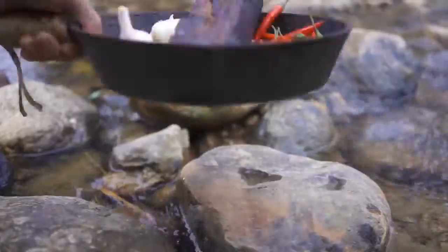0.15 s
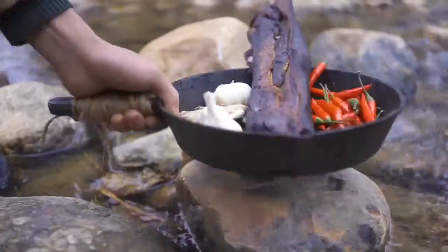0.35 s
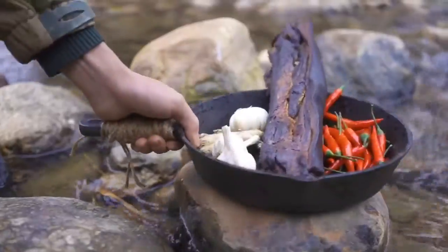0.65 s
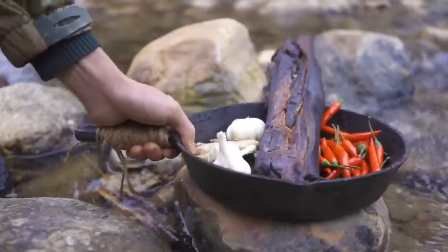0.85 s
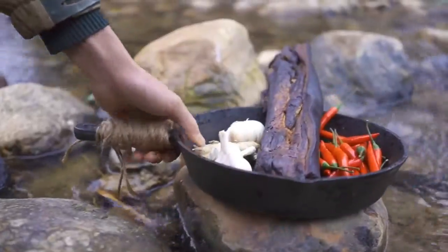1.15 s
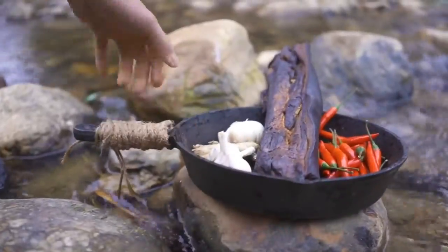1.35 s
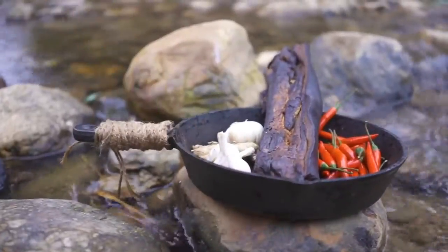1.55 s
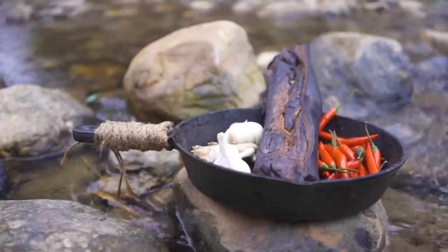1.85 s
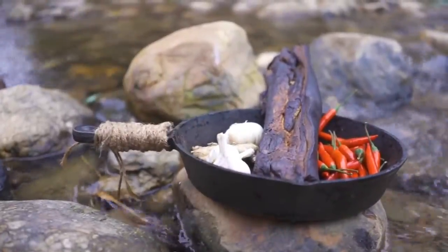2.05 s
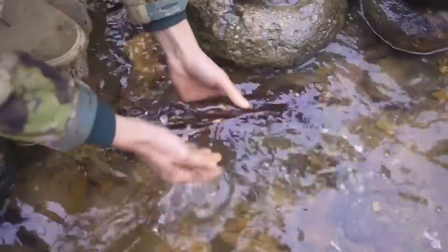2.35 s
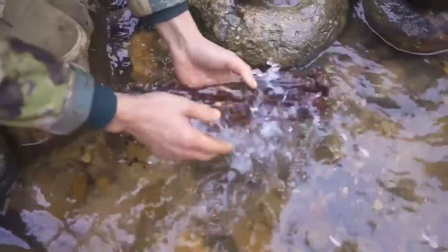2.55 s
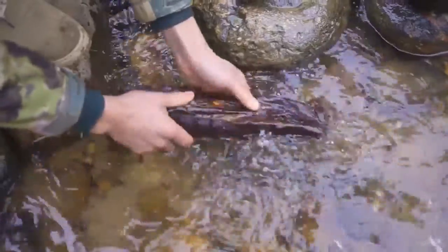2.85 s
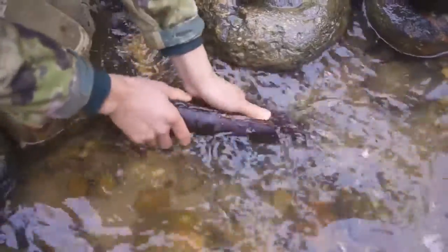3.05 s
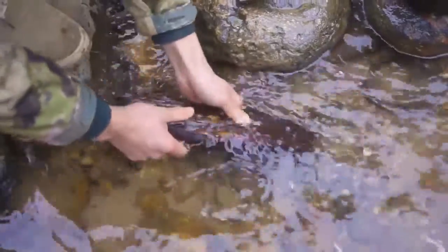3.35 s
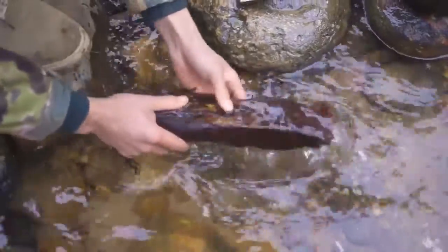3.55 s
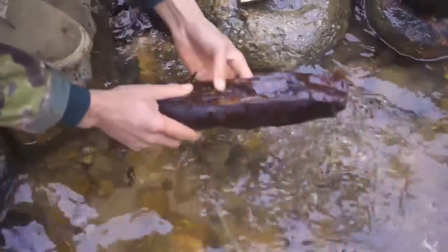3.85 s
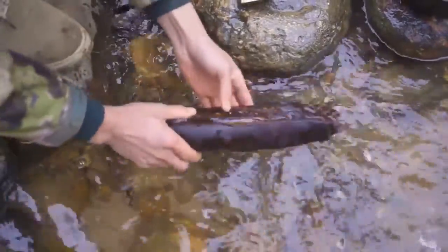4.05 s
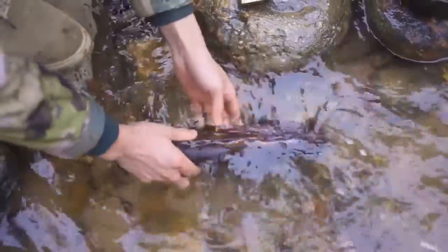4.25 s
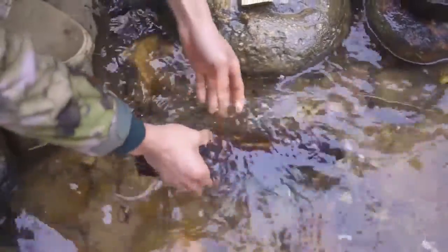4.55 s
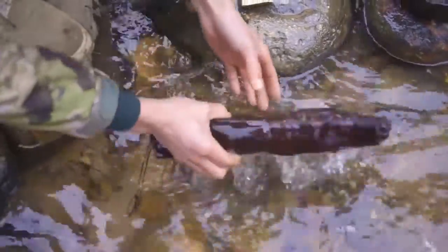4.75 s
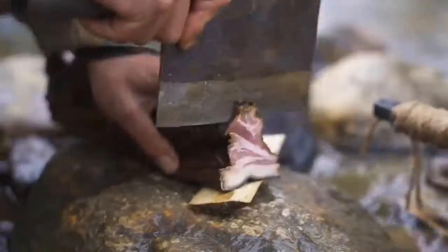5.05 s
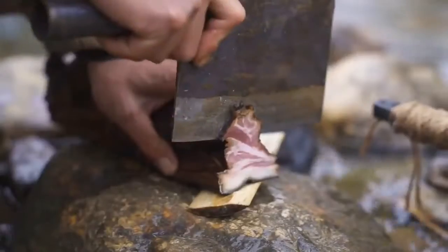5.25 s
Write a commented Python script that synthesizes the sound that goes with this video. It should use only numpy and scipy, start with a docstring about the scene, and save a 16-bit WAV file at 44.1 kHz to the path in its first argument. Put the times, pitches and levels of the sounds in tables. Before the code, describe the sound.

Quiet running water and deep rumble open the scene. Around one second a cast-iron pan grates briefly on rock and lands with a short, damped clank. After two seconds close splashing takes over: bubbly gurgles, spray and sharp drips in uneven bursts. A cleaver presses softly through meat at the end. Mono, close, dry open air with short dull reflections off stones.

```python
"""After a short silence a shallow stream babbles over a low throbbing drone and a rumble of wind.
An iron pan scrapes onto a boulder and knocks down: its ringing modes are struck, then kept alive by tiny slips.
Hands then rinse a slab of cured meat: swarms of ringing bubbles make the sloshes, gurgles, spray and drips.
Near the end a cleaver slides softly through the meat, as two shaped noises."""
import sys
import numpy as np
from scipy import signal
from scipy.fft import rfft, irfft, next_fast_len
from scipy.io import wavfile
from scipy.ndimage import uniform_filter1d, map_coordinates

SR = 44100
rng = np.random.default_rng(int(sys.argv[2]) if len(sys.argv) > 2 else 0)


def generate_wav(signal):
    """Clip the signal to [-1, 1] and save it as 16-bit WAV at the path in sys.argv[1]."""
    frames = np.transpose(np.atleast_2d(signal))
    scaled = np.clip(frames, -1, 1) * 32767
    pcm = np.round(scaled).astype(np.int16)
    wavfile.write(sys.argv[1], SR, pcm)


N = 238261  # length in samples, about 5.4 s


def amp(db):
    """Turns decibels into a gain."""
    return 10 ** (np.asarray(db) / 20)


def unit(x):
    """Scales a signal to an rms (average strength) of 1."""
    return x / np.sqrt(np.mean(x ** 2) + 1e-20)


def read(points, hz):
    """Reads a spectrum's dB at any frequency, in straight lines over log frequency."""
    f, db = np.transpose(points)
    return np.interp(np.log(hz + 1), np.log(f + 1), db)


def level(rows, axis=1):
    """Turns one dB column of a table into a smooth gain per sample; practically silent outside its times."""
    rows = np.array(rows)
    db = np.interp(np.arange(N) / SR, rows[:, 0], rows[:, axis], left=-120, right=-120)
    return uniform_filter1d(amp(db), size=130)


def colour(x, points):
    """Multiplies a sound's spectrum by a curve of (frequency [Hz], level [dB]), then scales to rms 1."""
    size = next_fast_len(N + 4096)
    gain = amp(read(points, np.fft.rfftfreq(size, 1 / SR)))
    return unit(irfft(rfft(x, size) * gain, size)[:N])


def add(mix, s, sound):
    """Mixes a sound in at time s, in seconds."""
    part = mix[round(s * SR):][:len(sound)]
    part += sound[:len(part)]


def wash(patchy_db):
    """White noise whose level drifts in small patches of time and pitch."""
    a, b, patches = rng.standard_normal((3, N // 128 + 6, 257))
    patches = uniform_filter1d(patches, size=7, axis=0)
    patches = unit(uniform_filter1d(patches, size=5, axis=1))
    spectra = (a + 1j * b) * amp(patchy_db * patches)
    return unit(signal.istft(spectra.T, nperseg=512, noverlap=384)[1][:N])


def bubble(hz, t60, rise, glide):
    """A trapped air pocket swells, fades by 60 dB in t60 seconds and climbs in pitch as it nears the surface."""
    t = np.arange(int((t60 + rise) * SR) + 8) / SR
    swell = np.minimum(t / (abs(rise) + 1e-5), 1)
    fade = amp(-60 * np.maximum(t - rise, 0) / t60)
    return swell * fade * np.sin(2 * np.pi * hz * np.cumsum(1 + glide * t / t60) / SR)


def swarm(per_s, low_hz, high_hz, cycles, spread_db, count=48):
    """Many small bubbles of varied pitch and random strength, roughly white overall."""
    out = np.zeros(N)
    for hz in np.geomspace(low_hz, min(high_hz, SR / 2.5), count):
        hz *= rng.uniform(.97, 1.03)
        ring_s = cycles * rng.uniform(1.0, 1.7) / hz
        grain = bubble(hz, ring_s, 1 / hz, glide=0.12)
        how_many = min(int(per_s * N / SR / count), 2000)
        at, size = rng.random((2, how_many))
        strength = amp(spread_db * np.minimum(-np.log(size), 4))
        clicks = np.bincount((at * N).astype(int), strength, N)
        out += hz * signal.oaconvolve(clicks, grain)[:N]
    return unit(out)


def stream(wash_db=-43.74, babble_db=-3):
    """Countless bubbles in the riffles merge into a wash; nearer ones stand out as babble."""
    # the running water's spectrum: (frequency [Hz], level [dB per Hz])
    water = [(60, 2), (130, 1.5), (250, -2.5), (520, -1.5), (900, -4), (1400, -6), (1900, -6),
             (2700, -17.5), (3800, -24), (5200, -26.5), (7000, -32.5), (10000, -36.5), (15800, -39)]
    babble = swarm(per_s=2500, low_hz=309.3, high_hz=7140, cycles=18.5, spread_db=1.0)
    return amp(wash_db) * (colour(wash(patchy_db=2.5), water) + amp(babble_db) * colour(babble, water))


def rumble(waver_hz=0.28, crest_s=0.12, fade_in_s=0.22, end_s=2.32):
    """Close low tones throb as they beat, until the rinsing begins; wind rumbles throughout."""
    # three low tones that beat against each other: (pitch [Hz], level [dB])
    tones = [(65.65, -41), (70.28, -38.5), (71.97, -44)]
    # wind spectrum: (frequency [Hz], level [dB per Hz])
    wind = [(15, -43), (35, -15.5), (55, 0.5), (70, 1), (95, -12), (140, -23.5), (250, -23), (600, -59)]
    # wind strength: (time [s], level [dB])
    gusts = [(0, -44.5), (2.25, -47.5), (2.35, -43), (3.0, -40), (3.5, -42.5), (4.0, -43.5), (4.95, -45.5),
             (5.1, -39), (5.4, -35.5)]
    t = np.arange(N) / SR
    # a slow random waver shared by all three tones
    waver = colour(rng.standard_normal(N), [(6, 0), (25, -50), (200, -120)])
    drift = rng.random() + np.cumsum(waver_hz * waver) / SR
    drone = np.zeros(N)
    for hz, db in tones:
        # the tones line up at crest_s
        drone += amp(db) * np.sqrt(2) * np.sin(2 * np.pi * (hz * (t - crest_s) + drift))
    sounding = np.minimum(t / fade_in_s, 1) * np.clip((end_s - t) / .02, 0, 1)
    return sounding * drone + level(gusts) * colour(rng.standard_normal(N), wind)


def bumps():
    """Soft handling bumps: dull, quickly damped thuds."""
    # (time [s], peak level [dB], pitch [Hz], time to fall 60 dB [s])
    thuds = [(1.99, -35, 192, 0.037), (1.997, -26, 280, 0.033), (2.291, -30, 129, 0.14),
             (2.304, -35, 233, 0.062), (5.16, -46, 305, .04), (5.173, -33, 193, .06), (5.19, -31, 380, .04)]
    out, t = np.zeros(N), np.arange(SR // 5) / SR
    for s, db, hz, t60 in thuds:
        add(out, s, amp(db - 60 * t / t60) * np.sin(2 * np.pi * hz * t))
    return out


def cleaver():
    """The blade presses dully into the meat and hisses along the cut."""
    # the cut: (time [s], press level [dB], hiss level [dB])
    cut = [(5.02, -67, -89), (5.1, -47.5, -68), (5.17, -41.5, -56), (5.22, -51, -64), (5.27, -42.5, -52.5),
           (5.32, -48, -63), (5.4, -44, -70)]
    # spectra of the press and the hiss: (frequency [Hz], level [dB per Hz])
    press_curve = [(80, -15), (170, 0), (450, 6), (900, -11), (2500, -9), (6000, -62)]
    hiss_curve = [(800, -3), (3000, 3), (7000, 0), (10000, -4), (15800, -15)]
    press, hiss = rng.standard_normal((2, N))
    # sparse random clicks, about 1500 a second
    fibres = unit(rng.standard_normal(N) * (rng.random(N) < 1500 / SR))
    pressing = level(cut, axis=1) * colour(press, press_curve)
    return pressing + level(cut, axis=2) * colour(hiss + amp(6) * fibres, hiss_curve)


def pan_ring(ring, tilt_db, pitch):
    """The iron's modes ring after one contact and die away; resting on the stone damps them."""
    # modes, before the factors of each contact: (pitch [Hz], level [dB], time to fall 60 dB [s])
    iron_modes = [(501, -1, 0.037), (575, -1, 0.076), (699, -18, 0.12), (970, 0.5, 0.011),
                  (1076, -9.5, 0.12), (1156, -10, 0.076), (1304, -5, 0.014), (1677, -9.5, 0.065),
                  (1730, -10, 0.033), (2100, -16, 0.056), (2500, -14.5, 0.052), (2970, -31, 0.062),
                  (3130, -46, 0.025), (3670, -26, 0.022), (4530, -24, 0.033), (5170, -43, .04),
                  (5770, -37.5, 0.046), (6636, -41, 0.074), (7100, -50, 0.1), (7850, -44.5, .04),
                  (8630, -45.5, 0.045)]
    t = np.arange(SR // 2) / SR
    out = np.zeros(len(t))
    for k, (hz, db, t60) in enumerate(iron_modes):
        tilt = tilt_db * np.log2(hz / iron_modes[1][0])  # dB per octave around the second mode
        fade = amp(db + tilt - 60 * t / (t60 * ring))
        out += (-1) ** k * fade * np.sin(2 * np.pi * hz * pitch * t)
    return out * (1 - np.exp(-t / .001))


def pan_knocks(grit_db=-15, grit_s=0.003, tail_db=-31, tail_s=.016):
    """Each contact with the stone crushes grit and sets the iron ringing."""
    # (time [s], gain [dB], factor on ring time, brightness [dB per octave], factor on pitch)
    contacts = [(0.8622, -23.5, 1.25, -1.5, 1.11), (0.933, -37.5, 1.8, 5.5, 1.04),
                (1.0221, -5.5, 1.22, 0.5, 1), (1.313, -35, 1.35, 5.5, 1.06)]
    out, t = np.zeros(N), np.arange(N) / SR
    onset = np.sin(np.pi / 2 * np.minimum(t / .001, 1)) ** 2
    # crushed grit, then a faint scatter off the boulders
    crush = onset * (amp(grit_db) * np.exp(-t / grit_s) + amp(tail_db) * np.exp(-t / tail_s))
    grit_curve = [(150, -5), (400, 0.5), (2500, -3.5), (6000, -14), (9300, -62), (11000, -55)]
    for s, db, ring, tilt_db, pitch in contacts:
        grit = colour(rng.standard_normal(N), grit_curve)
        add(out, s, amp(db) * crush * grit)
        add(out, s, amp(db) * pan_ring(ring, tilt_db, pitch))
    return out


def pan_scrape(rasp_db=-12, sing_hz=593):
    """Tiny slips over the stone's grains keep the iron ringing; friction makes it sing and squeak."""
    # the drag: (time [s], grinding level [dB], singing level [dB], factor on pitch)
    drag_path = [(0.866, -26, -25.5, 1.02), (0.879, -35, -23.5, 1), (0.896, -32, -35, 1),
                 (0.918, -33, -50, 1.01), (0.942, -42, -32, 1.04), (0.953, -38, -48, 1.05),
                 (0.968, -40.5, -65, 1.02), (0.99, -64, -70, 1.2)]
    # iron sticking and slipping in a brief squeak: (time [s], level [dB], pitch [Hz])
    squeak_path = [(0.946, -46, 1133), (0.956, -32, 1166), (0.968, -37, 1176), (0.985, -45, 1270)]
    # grains under the iron: (frequency [Hz], level [dB per Hz])
    rasp_curve = [(200, -12), (1000, -4), (2400, 9), (5000, -17.5), (9000, -28), (15000, -45)]
    t = np.arange(N) / SR
    slips = rng.standard_normal(N) * (rng.random(N) < 2500 / SR)
    drag = signal.oaconvolve(slips, pan_ring(ring=3.7, tilt_db=3, pitch=0.99))[:N]
    # the pitch bends as the point of contact shifts: play the drag along a bent clock
    s, _, _, pitch = np.transpose(drag_path)
    bent = np.cumsum(np.interp(t, s, pitch)) / SR
    drag = unit(map_coordinates(drag, [bent * SR], order=3))
    grinding = unit(drag + amp(rasp_db) * colour(slips, rasp_curve))
    sing = np.sqrt(2) * np.sin(2 * np.pi * sing_hz * bent)
    s, _, hz = np.transpose(squeak_path)
    squeak = np.sqrt(2) * np.sin(2 * np.pi * np.cumsum(np.interp(t, s, hz)) / SR)
    scraping = level(drag_path, axis=1) * grinding + level(drag_path, axis=2) * sing
    return scraping + level(squeak_path) * squeak


def pan():
    """The pan touches the boulder, drags with a squeak, then drops."""
    return pan_knocks() + pan_scrape()


def stirring(lumpy_db=1.0):
    """Gains of slosh and spray: each stroke builds to a crest in uneven spurts, then the water settles."""
    # strokes of hands and slab, levels before the mix in churn:
    # (crest time [s], slosh level [dB], spray level [dB], rise [s], fall [s])
    strokes = [(2.385, -42, -46.5, 0.018, 0.02), (2.495, -38.5, -55, 0.018, 0.13),
               (2.69, -34.5, -47.5, 0.038, 0.057), (2.76, -38.5, -50.5, 0.059, 0.077),
               (2.94, -38.5, -64, 0.038, 0.033), (2.996, -37, -44, 0.0043, .012),
               (3.011, -37, -40, .006, 0.021), (3.12, -50, -49, 0.028, 0.04), (3.23, -45, -50, .012, .015),
               (3.58, -54, -53.5, 0.23, 0.12), (3.69, -59, -46, 0.079, 0.19),
               (3.84, -40, -53.5, 0.13, 0.22), (4.115, -44, -46.5, 0.013, 0.012),
               (4.19, -37, -46, 0.019, 0.016), (4.218, -28.5, -39, 0.011, 0.0063),
               (4.53, -46, -59, 0.21, 0.097), (4.89, -39.5, -54.5, 0.021, 0.08),
               (4.99, -38, -52, 0.089, 0.021)]
    t, power = np.arange(N) / SR, np.zeros((2, N))
    for s, slosh_db, spray_db, rise, fall in strokes:
        shape = np.exp(-(np.minimum(t - s, 0) / rise) ** 2 - np.maximum(t - s, 0) / fall)
        power += (amp([[slosh_db], [spray_db]]) * shape) ** 2
    lumps = colour(rng.standard_normal(N), [(5, -10), (20, 0), (60, 0), (200, -40), (1000, -120)])
    return np.sqrt(power) * unit(amp(lumpy_db * np.clip(lumps, -2, 2)))


def churn(slosh_db=-8, patter_db=-7, gurgle_db=-4.0, spray_db=-2, mist_db=-2, ticks_db=-13):
    """Stirred water churns with bubbles, gurgles, sheds droplets and throws fine spray."""
    # spectra of the slosh and the spray: (frequency [Hz], level [dB per Hz])
    slosh_curve = [(200, -63), (450, -14), (800, 8), (1700, 8), (2400, 6), (3300, 6), (5000, -19),
                   (9000, -20)]
    spray_curve = [(1500, 8), (3000, 3.5), (5800, 1), (7200, -4.5), (10000, -11), (15800, -18)]
    slosh = colour(swarm(per_s=800, low_hz=354, high_hz=5000, cycles=10, spread_db=1.5), slosh_curve)
    droplets = swarm(per_s=300, low_hz=1000, high_hz=6500, cycles=13, spread_db=2.5)
    patter = colour(droplets, [(700, -8), (1800, 14), (3200, -17), (6000, -10.5), (9000, -27)])
    plops = swarm(per_s=330, low_hz=699, high_hz=5000, cycles=44, spread_db=1.5)
    gurgle = colour(plops, [(700, 2.5), (1700, 0), (3000, -7), (4500, -13)])
    fizz = swarm(per_s=2000, low_hz=2370, high_hz=15000, cycles=36, spread_db=0.8)
    ticks = swarm(per_s=70, low_hz=2500, high_hz=9000, cycles=5, spread_db=2, count=12)
    spray = colour(fizz + amp(mist_db) * wash(patchy_db=3.0) + amp(ticks_db) * ticks, spray_curve)
    sloshing, spraying = stirring()
    body = amp(slosh_db) * slosh + amp(patter_db) * patter + amp(gurgle_db) * gurgle
    return sloshing * body + amp(spray_db) * spraying * spray


def plopping(glide=0.12, swell=0.07, shed_db=-17, shed_s=0.035):
    """Large bubbles plop, and each sheds three smaller, higher ones."""
    # the largest bubbles: (time [s], peak level [dB], starting pitch [Hz], time to fall 60 dB [s])
    big_bubbles = [(2.357, -31.5, 1320, 0.022), (2.378, -33, 3000, 0.015), (2.484, -21, 1480, 0.014),
                   (2.527, -28.5, 564, 0.035), (2.628, -29, 3300, 0.011), (2.684, -30, 1750, 0.021),
                   (2.697, -23.5, 2150, 0.013), (2.718, -28, 773, 0.047), (2.724, -34, 1690, 0.056),
                   (2.746, -23, 1280, 0.033), (2.764, -30.5, 1617, .06), (2.9365, -23, 430, 0.023),
                   (2.95, -28.5, 1740, 0.033), (2.994, -27.5, 2700, 0.015), (3.013, -21.5, 1514, 0.02),
                   (3.039, -26, 1980, 0.016), (3.158, -25, 1700, 0.012), (3.705, -27, 1945, 0.029),
                   (3.81, -17.5, 1066, 0.053), (3.835, -30.5, 820, 0.053), (3.847, -33, 1980, .026),
                   (3.892, -25.5, 1636, .03), (4.0492, -16, 1860, 0.011), (4.213, -19, 1615, 0.017),
                   (4.292, -26, 2580, 0.0046), (4.443, -26, 805, .017), (4.547, -39.5, 6000, 0.017),
                   (4.598, -29.5, 1513, .05), (4.854, -18, 1207, 0.018), (4.874, -33, 1670, .04),
                   (4.901, -29.5, 790, 0.036), (4.921, -25, 1110, 0.018), (4.96, -28.5, 1510, 0.029)]
    out = np.zeros(N)
    for s, db, hz, t60 in big_bubbles:
        rise = swell * t60  # a bubble swells for this share of its ring time
        add(out, s, amp(db) * bubble(hz, t60, rise, glide))
        for delay, octaves in rng.random((3, 2)):
            small = bubble(hz * 2 ** octaves, t60 / 2 ** octaves, rise, glide)
            add(out, s + shed_s * delay, amp(db + shed_db) * small)
    return out


def slapping(crack_db=-27, crack_s=0.00065):
    """A drop slapping the surface is a pulse only a cycle or two long, with a thin noisy crack."""
    # the hardest drops: (time [s], peak level [dB], centre frequency [Hz])
    hard_drops = [(2.3065, -40, 6000), (2.358, -27, 1800), (2.4994, -24.5, 1270), (2.9083, -18, 1470),
                  (2.995, -36, 3500), (3.008, -30, 2740), (3.014, -23.5, 4740), (3.04, -29, 2350),
                  (3.047, -20.5, 2480), (3.809, -28, 2710), (3.897, -22, 5200), (4.0485, -20.5, 2230),
                  (4.212, -25.5, 2700), (5.009, -41, 4500)]
    out, t = np.zeros(N), np.arange(SR // 50) / SR
    for s, db, hz in hard_drops:
        u = t * hz / .7  # the pulse peaks after 0.7 of a cycle
        pulse = u * np.exp(1 - u) * np.sin(2 * np.pi * hz * t)
        crack = amp(crack_db) * np.exp(-t / crack_s) * rng.standard_normal(len(t))
        add(out, s, amp(db) * (pulse + crack))
    return out


def boulders(x, echo_db=-11, echo_s=0.0034):
    """The nearby stones scatter a short, dull echo."""
    t = np.arange(SR // 16) / SR
    # sparse random reflections, none within the first 2 ms
    taps = rng.standard_normal(len(t)) * (rng.random(len(t)) < 3000 / SR)
    taps *= np.exp(-t / echo_s) * (t > .002)
    taps = signal.lfilter(*signal.butter(1, 4500, fs=SR), taps)
    return x + amp(echo_db) * signal.oaconvolve(x, taps / np.linalg.norm(taps))[:N]


def rinsing():
    """Churning water, with single drips that echo off the stones."""
    return churn() + boulders(plopping() + slapping())


def scene():
    """All sources added together, in mono."""
    return (stream() + rumble() + bumps() + cleaver() + pan() + rinsing())[None]


def record(dry, start_s=0.066, edge_hz=15900):
    """The sound opens after a short silence; then everything above the edge is filtered away."""
    opened = dry * np.clip((np.arange(N) / SR - start_s) / .003, 0, 1)
    lowpass = signal.firwin(511, edge_hz, window=("kaiser", 9), fs=SR)
    return signal.oaconvolve(opened, lowpass[None], "same")


dry = scene()
out = record(dry)
generate_wav(out)
```